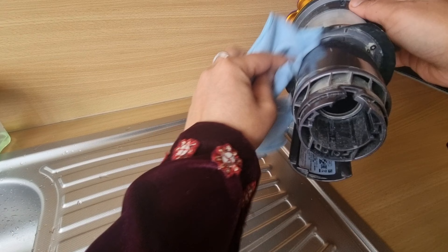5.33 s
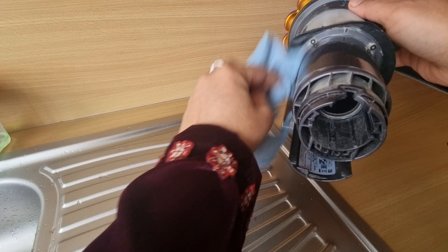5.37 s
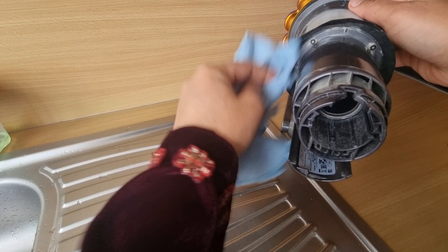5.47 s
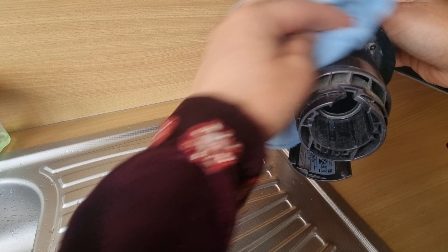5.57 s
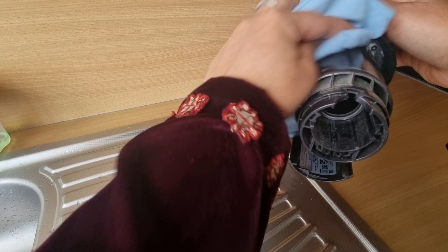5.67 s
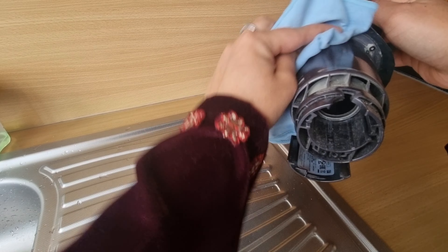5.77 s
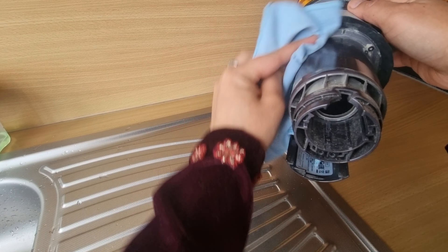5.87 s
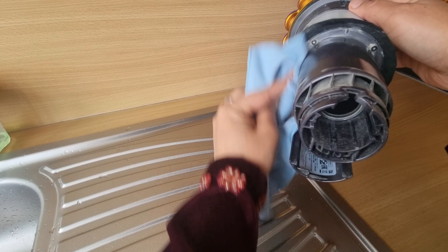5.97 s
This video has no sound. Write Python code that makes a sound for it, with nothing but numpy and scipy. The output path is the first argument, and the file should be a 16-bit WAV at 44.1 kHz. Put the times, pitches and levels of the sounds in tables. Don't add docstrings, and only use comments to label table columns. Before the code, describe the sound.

Dry fabric rasps against a plastic shell, which creaks and taps on the ribs of a thin steel board. Busy at first, it calms for a few seconds with only light rubs and ticks. A sudden heavy clunk, booming and rattling briefly, is followed by fast bounces, then more wiping and clicking, growing firmer at the end. Close microphones, short indoor echo, quiet kitchen air.

```python
import sys
import numpy as np
from scipy import signal
from scipy.fft import rfft, irfft, next_fast_len
from scipy.io import wavfile
from scipy.ndimage import uniform_filter1d

SR = 44100
rng = np.random.default_rng(int(sys.argv[2]) if len(sys.argv) > 2 else 0)


def convert_level_to_amplitude(level_db):
    exponent = np.asarray(level_db, float) / 20
    return 10 ** exponent


def to_wav(s):
    ch = np.atleast_2d(s).T
    pcm = np.round(np.clip(ch, -1, 1) * 32767)
    wavfile.write(sys.argv[1], SR, pcm.astype(np.int16))


N = 265658

# (fastest moment [s], rubbing level [dB], speeding up [s], slowing down [s],
# finest hiss above its usual share [dB])
STROKES = [(0.0, -47.5, 0.055, 0.18, 8), (0.33, -54.5, 0.11, 0.61, -19), (.52, -56.5, 0.36, 0.75, -10),
           (0.699, -47.5, 0.058, 0.11, 14), (1.085, -49.5, 0.1, 0.18, -12), (1.3, -47.5, 0.081, 0.054, 22),
           (1.31, -46, 0.26, 0.33, -3), (1.53, -59, 0.28, 0.83, -11), (2.0, -61, 0.088, 1, 4.5),
           (2.78, -56.5, 0.2, 0.25, 5.5), (2.89, -63.5, 0.18, 0.2, 5), (3.2, -65, 0.04, .3, 9),
           (3.64, -62.5, 0.88, 0.47, 4.5), (4.12, -55, 0.27, 0.98, -0.5), (4.44, -55, 1, 0.21, 8),
           (4.533, -44, 0.14, 0.089, 10), (4.66, -45, .1, 0.3, 2), (4.9, -61, 0.099, 0.2, 2),
           (4.98, -56, 0.044, 0.08, 18), (5.079, -47.5, 0.26, 0.099, 2), (5.23, -48.5, 0.24, 0.23, 6),
           (5.347, -50.5, 0.45, 0.084, 11.5), (5.52, -69.5, 0.58, 0.15, 13), (5.65, -53.5, 0.11, 0.54, -6),
           (5.9, -54, 0.29, 0.12, 28), (6.02, -40, 0.35, .1, 3)]
# (frequency [Hz], level per Hz [dB])
FIBRE_COLOUR = [(140, -55), (230, -21), (280, -8), (340, 4), (485, -11.5), (549, -24), (679, -15.5),
                (1040, -8), (3020, -7), (4790, -10.5), (7200, -13.5), (9070, -25), (16000, -27)]
# (time [s], extra body [dB])
PRESSURE = [(0, 4.5), (.33, 2), (.6, 3.5), (1.0, 1), (1.3, 1.5), (1.6, -2), (2.1, 2), (2.6, 0.5),
            (2.8, -10), (2.95, -15), (3.3, -1.5), (3.8, -1.5), (4.2, -0.5), (4.5, -3.5), (4.9, 2), (5.3, 0),
            (5.65, 4), (6.02, 0)]
# (frequency [Hz], level [dB], time to fade by 60 dB [s])
SHELL_MODES = [(1040, -14.5, 0.02), (1260, -9, 0.013), (1420, 3, 0.0086), (1663, -12.5, 0.04),
               (1880, -11.5, 0.063), (2310, -13.5, 0.015), (2870, -4.5, 0.02)]
LOW_SHELL_MODES = [(554.0, -7.0, 0.053), (783.0, -5.0, 0.043)]
# (time [s], peak level [dB], strongest ring [Hz], left minus right [dB])
DULL_KNOCKS = [(.3215, -19, 1790, -4.5), (.3314, -23.5, 1390, 1), (0.3497, -25.5, 1350, -1),
               (.395, -22, 1820, -9), (0.523, -27, 1700, 5), (.529, -26, 1080, 10.5),
               (0.5557, -35, 1660, -3), (0.667, -37.5, 1700, -3), (.743, -24, 1340, 3.5),
               (.9778, -54, 1110, -19), (1.0171, -29, 1100, 0), (1.027, -31, 1900, 0),
               (1.036, -24.5, 1100, -8), (1.2315, -33.5, 1120, -10), (1.252, -31.5, 1110, -4),
               (1.2859, -27.5, 1580, -7), (1.3792, -39, 1360, 5), (3.6186, -44.5, 1400, 14),
               (4.1122, -27.5, 1580, -8), (4.353, -34.5, 2020, -6), (4.621, -17, 1070, 3),
               (5.1194, -31, 2050, -1), (5.1514, -26.5, 1360, 2), (5.2023, -21, 1130, -3),
               (5.2342, -29, 1380, -6), (5.5375, -40, 1160, -3), (5.614, -28, 1420, -8),
               (5.6379, -19, 1140, -4), (5.7412, -31.5, 1670, 4), (5.918, -20, 2130, -2),
               (5.942, -30, 2050, -3), (5.962, -30, 2050, -3), (5.983, -29, 2100, -3),
               (6.003, -28, 2100, -3)]
BARE_KNOCKS = [(0.177, -40.5, 1430, -2), (.2886, -60, 950, -7), (0.4033, -26.5, 1340, 1),
               (0.6916, -24, 1300, -4), (0.7068, -21, 1310, -4), (.7295, -25, 1260, -9.5),
               (0.771, -33.5, 1860, -1), (1.0027, -36, 1290, -2), (1.0696, -22, 1350, -4),
               (1.272, -40, 1120, -19), (1.3168, -26, 1630, -8), (1.4165, -36, 2100, -8),
               (3.6794, -51, 1230, 8), (4.5688, -9, 1270, 0), (4.5788, -17, 2000, -4),
               (4.6257, -19.5, 1400, -11), (4.9346, -30, 2020, -10), (4.9877, -31.5, 2870, -5),
               (4.996, -26, 1250, -5), (5.0388, -30, 2870, -6), (5.0947, -26.5, 2950, -5),
               (5.102, -28, 1480, -9), (5.4992, -44.5, 1320, -4), (5.6005, -22.5, 1260, -3),
               (5.7528, -33.5, 1428, -1), (5.8313, -28, 1650, -0.5), (5.8557, -31.5, 2400, 5)]
# (time [s], peak level [dB], strongest ring [Hz], left minus right [dB], brightness [dB])
SNAPS = [(1.055, -26.5, 2620, -2, 38), (1.485, -20.5, 1720, -5.5, -16), (4.042, -24, 1040, -3.5, -15.5),
         (1.9053, -46, 1260, 5, 23.5), (2.5709, -32, 2340, 2, 8), (2.6204, -47, 2870, -3, 3),
         (2.69, -32, 3180, -10, 28), (3.178, -54, 3080, 13, -1), (3.2677, -51, 1060, -5, -5),
         (4.163, -40, 2100, -12, -8), (4.6729, -14, 1190, -4, -13), (5.2193, -22.5, 1780, -7, -6),
         (5.909, -26, 2470, -5, -6)]
# (low edge [Hz], high edge [Hz], level [dB])
CRACK_BANDS = [(945, 1100, -17), (2350, 4430, 6.5), (4040, 10100, 5), (10900, 22000, -0.5)]
# (frequency [Hz], level [dB])
RIM_MODES = [(4100, -32), (5500, -22), (7300, -43)]
# (time [s], peak level [dB], whole-board boom [dB], sheet rattle [dB],
# strongest body tone [Hz])
THUMPS = [(0.049, -38.5, -23, 2.5, 358), (0.225, -42, -10, -5, 200), (0.322, -34, -4, 4.5, 369),
          (0.398, -41.5, -20, -5, 444), (0.691, -38, -9, 7, 377), (1.308, -26.5, -20, -0.5, 400),
          (1.335, -26.5, -12, -6.5, 205), (1.381, -30, -20, -6, 202), (1.61, -44, -20, 4.5, 331),
          (1.72, -46, -15, 0, 200), (1.85, -47, -20, 0, 320), (2.343, -44, -30, -1.5, 400),
          (2.692, -44.5, -20, 0, 223), (2.77, -48, -20, 0, 500), (3.379, -35, -26, 4, 224),
          (3.518, -54, -14, 4, 320), (3.759, -50, -25, 4, 304), (4.041, -43, -22, 5, 202),
          (3.675, -43, -26, 7, 347), (4.5622, -21, -3, 2, 550), (4.569, -1.5, 0.5, -7, 190),
          (4.619, 2.5, -7.5, -7, 300), (4.674, -5, -6, -4, 318), (4.645, -9.5, -16, -10, 400),
          (4.698, -12.5, -19, -10, 300), (4.724, -18, -15, -12, 350), (4.795, -25.5, -20, -6, 330),
          (4.916, -32, -20, 3, 304), (5.0, -39, -20, -5, 202), (5.098, -36, -21, 5, 363),
          (5.155, -45.5, -20, -5, 398), (5.205, -21.5, -8, -5.5, 395), (5.218, -22, -23, -11, 300),
          (5.311, -44, -27, 2, 393), (5.636, -28, -20, -29, 300), (5.885, -38, -17, -3, 205),
          (5.908, -29, -6, 0, 600), (6.002, -32, 7, 0, 250)]
# (frequency [Hz], level [dB], time to fade by 60 dB [s])
BOARD_MODES = [(54.43, -6, 0.74), (95, -5, 0.096), (117.8, 4.5, 0.42), (160, -3, 0.13), (197, 2.5, 0.14),
               (275, -13, 0.045), (317, -7.5, 0.11), (403.4, -5, 0.11), (428.5, -8.5, 0.084),
               (565, -10, 0.05), (658, -11.5, 0.059), (777, -7, 0.072), (830, -7, 0.054),
               (1073, -2.5, 0.054)]
# (low edge [Hz], high edge [Hz], level [dB], time to fade by 60 dB [s])
RATTLE_BANDS = [(252, 363, -19, 0.36), (488, 1010, -27, 0.39), (930, 1450, -29, 0.28),
                (1590, 3800, -33, 0.34)]
# (time [s], level [dB], letting go [s])
LEANS = [(.12, -45.5, 0.073), (.3, -38.5, 0.14), (.45, -37.5, 0.028), (.6, -41, 0.15), (.78, -37.5, 0.087),
         (1.09, -37.5, 0.091), (1.36, -36, .1), (1.43, -30, 0.06), (1.49, -29, 0.09), (1.65, -40.5, 0.19),
         (2.212, -50, 0.19), (2.61, -46, .1), (2.83, -48, 0.27), (3.22, -57, 0.14), (3.31, -39.5, 0.1),
         (3.63, -50, 0.16), (4.1, -41.5, 0.28), (4.18, -38, 0.19), (4.52, -61, 0.071), (4.774, -23, 0.076),
         (4.86, -38, 0.15), (4.97, -41, 0.017), (5.08, -32.5, 0.21), (5.3, -43, 0.099),
         (5.411, -42.5, 0.042), (5.71, -49.5, .1), (5.94, -41, 0.065), (6.02, -24.5, 0.11)]
NUDGES = [(0.0, -40, 0.11), (.3, -40, 0.075), (.62, -46.5, 0.25), (.72, -55, .1), (.97, -35, 0.029),
          (1.36, -35, 0.21), (1.59, -52, 0.11), (1.74, -49, 0.16), (2.06, -37.5, 0.14), (2.43, -40, 0.32),
          (2.5, -52, 0.22), (2.83, -45.5, 0.12), (3.22, -43.5, 0.19), (3.401, -37, 0.021),
          (3.63, -47.5, 0.079), (4.18, -45, 0.049), (4.52, -43.5, 0.43), (4.72, -28, 0.073),
          (5.016, -51, .1), (5.23, -47, 0.14), (5.556, -42, 0.076), (5.94, -31, 0.055),
          (5.98, -26.5, 0.062)]
ROCKS = [(.06, -43.5, 0.15), (.36, -38.5, 0.14), (.47, -47, 0.25), (.6, -47.5, 0.076), (.72, -44.5, 0.2),
         (.97, -49.5, 0.27), (1.088, -39, 0.14), (1.359, -29, 0.18), (1.6, -53, 0.085), (2.06, -48, 0.15),
         (2.27, -57.5, 0.078), (2.83, -53.5, 0.14), (3.4, -45, 0.026), (3.63, -78.5, 0.15),
         (4.1, -42, 0.23), (4.29, -51.5, 0.34), (4.41, -44.5, 0.076), (4.72, -34, 0.054),
         (4.774, -31, 0.16), (5.016, -42.5, 0.075), (5.099, -42.5, 0.29), (5.36, -49, 0.11),
         (5.494, -54, 0.27), (5.63, -44.5, 0.39), (5.77, -46, 0.066), (5.94, -39.5, .06),
         (6.02, -26.5, 0.11)]
# (frequency [Hz], width [Hz], level [dB])
SHAKEN_MODES = [
    [(52.25, 3.5, 0)],
    [(76.2, 11, 0)],
    [(116.2, 6.6, 6), (140, 78, -3.5), (198.3, 27, -4.5)],
]
# (frequency [Hz], level per Hz [dB])
ROOM_COLOUR = [(76, -30), (130, 11), (233, -20), (356, -14.5), (450, -10), (640, -16), (810, -8),
               (1000, -15.5), (1290, -16), (2890, -14), (4780, -16), (7150, -17.5), (10500, -53),
               (12600, -31), (16000, -22.5)]
# (frequency [Hz], width [Hz], level [dB])
DRONE = (346, 32, -62.5)
# (frequency [Hz], side minus mid [dB])
STEREO_WIDTH = [(60, -15.5), (120, -14.5), (240, -9.5), (480, 1), (950, 3), (1890, 2), (3770, 1),
                (7520, 0.5), (15000, 0)]
# (frequency [Hz], width [Hz], gain [dB])
MICROPHONE = [(7350, 1870, 9.5), (8800, 5840, -6), (15600, 1900, 6)]

TOP_HZ = 16100
STEP = 32
GRAIN_DB = 0.8


def wiping():
    curve, rest_db = 2.38, -87
    jerk_db, jerk_t60_s = -21.5, 0.17
    strokes = np.array([swell(s, db, rise, fall, curve) for s, db, rise, fall, _ in STROKES])
    s, peak_db, _, bright_db = np.transpose(knock_list())[:4]
    kicks = impulses(s, convert_level_to_amplitude(2 * (peak_db + jerk_db + 0.087 * bright_db)))
    jerks = signal.lfilter([1], [1, -convert_level_to_amplitude(-120 / (jerk_t60_s * SR))], kicks + 1e-18)
    power = per_sample(strokes.sum(axis=0)) + jerks + convert_level_to_amplitude(2 * rest_db)
    rub_db = 10 * np.log10(power)
    fine_db = per_sample(np.array(STROKES)[:, -1] @ strokes) / power
    pressed_db = np.interp(np.arange(N) / SR, *np.transpose(PRESSURE))
    body_db = 0.17 * (-52.5 - rub_db) - 0.13 * fine_db + pressed_db
    return rub_db, fine_db, body_db


def cloth(rub_db, fine_db, body_db):
    rasp = rubbing(FIBRE_COLOUR, patchy_db=1.14, grain_db=GRAIN_DB, fine_db=fine_db, body_db=body_db)
    creaking = creak(per_s=270, spread_db=4.5)
    return convert_level_to_amplitude(rub_db + 3.5) * rasp + convert_level_to_amplitude(rub_db + body_db - 0.5) * creaking


def rubbing(spectrum, patchy_db, grain_db, fine_db=0, body_db=0):
    out, power, together = 0, 0, drift(22.0)
    slips = rng.standard_normal((2, 2, N)) * convert_level_to_amplitude(grain_db * drift(150))
    edges = np.geomspace(140, TOP_HZ, 17)
    for k, (low, high) in enumerate(zip(edges, edges[1:])):
        mid, side = band(slips[k % 2], low, high)
        hz = np.sqrt(low * high)
        hiss_db = fine_db * np.clip(np.log2(hz / 6000), 0, 1)
        tilt_db = hiss_db + body_db * np.clip(np.log2(2600 / hz), 0, 1)
        depth_db = patchy_db * min(1, 700 / hz) ** 0.22
        gain = convert_level_to_amplitude(tilt_db + depth_db * (0.36 * together + drift(14)))
        level = convert_level_to_amplitude(at_hz(spectrum, hz))
        out = out + gain * level * left_right(mid, side, hz)
        power += np.mean((level * mid) ** 2)
    return out / np.sqrt(power)


def creak(per_s, spread_db):
    out = 0
    for hz, mode_db, t60 in SHELL_MODES + LOW_SHELL_MODES:
        caught = rng.random((2, N)) < per_s * convert_level_to_amplitude(5.0 * drift(7)) / SR
        sizes = convert_level_to_amplitude(spread_db * np.minimum(rng.exponential(1, (2, N)), 4))
        sizes = sizes * rng.choice([-1, 1], (2, N))
        out = out + convert_level_to_amplitude(mode_db) * ring(left_right(*(caught * sizes), hz), hz, 1.3 * t60)
    return rms_one(out)


def knock_list():
    # (time [s], peak [dB], ring [Hz], brightness [dB], contact fade [s], left minus right [dB])
    dull = [(s, db, hz, -50.5, 0.03, pan) for s, db, hz, pan in DULL_KNOCKS]
    bare = [(s, db, hz, -21.5, 0.024, pan) for s, db, hz, pan in BARE_KNOCKS]
    snaps = [(s, db, hz, bright, 0.024, pan) for s, db, hz, pan, bright in SNAPS]
    return sorted(dull + bare + snaps)


def shell_knocks():
    out, t = np.zeros((2, N + 4096)), np.arange(4096) / SR
    for s, peak_db, ring_hz, bright_db, t60, pan_db in knock_list():
        luck = rng.standard_normal(len(SHELL_MODES))
        slips = rng.standard_normal((2, 2, len(t)))
        grip = np.minimum(rng.standard_normal(len(t) // 32), 1)
        grip[:4] = 1
        slips = slips * convert_level_to_amplitude(7.0 * grip.repeat(32))
        contact = (1 - np.exp(-t / 0.0027)) * convert_level_to_amplitude(-60 * t / np.clip(t60, .006, .09))

        knock = convert_level_to_amplitude(-27.0) * ring(left_right(*slips[0], ring_hz) * contact, ring_hz, 22 / ring_hz)
        for (hz, mode_db, mode_t60), chance in zip(SHELL_MODES, luck):
            level_db = mode_db - 4.2 * abs(np.log2(hz / ring_hz)) + 7 * np.tanh(chance) - 33
            knock += convert_level_to_amplitude(level_db) * ring(left_right(*slips[0], hz) * contact, hz, mode_t60)
        for low, high, crack_db in CRACK_BANDS:
            tilt_db = bright_db * np.clip(np.log2(high / 1900) / 2, 0, 1)
            crack = band(left_right(*slips[1], high) * contact, low, high)
            knock += convert_level_to_amplitude(crack_db + tilt_db) * crack
        rim_shift = 1 + 0.12 * np.tanh(luck[-1])
        for (hz, rim_db), chance in zip(RIM_MODES, luck):
            rim = ring(left_right(*slips[1], hz) * contact, hz * rim_shift, 0.016)
            knock += convert_level_to_amplitude(rim_db + bright_db + 6 * np.tanh(chance)) * rim

        knock = band(knock, 760, TOP_HZ)
        knock *= convert_level_to_amplitude(-1.0) / np.sort(np.abs(knock), axis=None)[-12]
        at = round(s * SR)
        out[:, at:at + len(t)] += convert_level_to_amplitude(peak_db) * knock * convert_level_to_amplitude([[pan_db / 2], [-pan_db / 2]])
    return out[:, :N]


def thumps():
    s, peak_db, boom_db, shiver_db, body_hz = np.transpose(THUMPS)
    luck, out = rng.standard_normal((len(s), 2, len(BOARD_MODES))), 0
    since = np.arange(N) / SR - 4.685
    damped = convert_level_to_amplitude(-92 * np.where(since < 0.45, np.maximum(since, 0), 0))
    for k, (hz, mode_db, t60) in enumerate(BOARD_MODES):
        upper_db = 2.93 * luck[:, 0, k] - 5 - 4.5 * abs(np.log2(hz / body_hz))
        gain = convert_level_to_amplitude(peak_db + mode_db + np.where(hz < 135, boom_db - 7.0, upper_db))
        mid = ring(impulses(s, -gain * (-1) ** k), hz, t60)
        side = ring(impulses(s, gain * np.sign(luck[:, 1, k])), hz * 1.02, t60)
        side = side * np.clip(hz / 260, 0, 1)
        out = out + left_right(mid, side, hz) * (damped if 85 < hz < 135 else 1)
    out = signal.sosfilt(signal.butter(2, 905, fs=SR, output="sos"), out)
    for low, high, rattle_db, t60 in RATTLE_BANDS:
        hits = impulses(s, convert_level_to_amplitude(peak_db + shiver_db + rattle_db))
        fade = signal.lfilter([1], [1, -convert_level_to_amplitude(-60 / (t60 * SR))], hits)
        noise = rms_one(band(rng.standard_normal((2, N)), low, high))
        out = out + fade * left_right(*noise, low)
    return out


def board_shake():
    out = 0
    rises_s, rests_db = (0.14, 0.051, 0.11), (-59.5, -61.5, -65)
    for pushes, rise_s, rest_db, modes in zip((LEANS, NUDGES, ROCKS), rises_s, rests_db, SHAKEN_MODES):
        power = convert_level_to_amplitude(2 * rest_db) + sum(swell(s, db, rise_s, fall_s, 1.57) for s, db, fall_s in pushes)
        group = 0
        for hz, width, mode_db in modes:
            t60 = np.log(1000) / np.pi / width
            mid, side = ring(ring(rng.standard_normal((2, N)), hz, t60), hz, t60 / 3)
            group = group + convert_level_to_amplitude(mode_db) / mid.std() * left_right(mid, side, hz)
        strength = uniform_filter1d(np.mean(group ** 2, axis=0), size=round(0.11 * SR))
        out = out + per_sample(np.sqrt(power)) * group / np.sqrt(strength + 1e-9)
    return out


def kitchen(x):
    size = next_fast_len(N + SR)
    hz = np.arange(size // 2 + 1) * SR / size
    t60 = 0.33 / np.hypot(1, hz / 12000)
    out = []
    for side, lags in zip(x, rng.uniform(.013, .045, (2, 12))):
        loops = [convert_level_to_amplitude(-60 * lag / t60) * np.exp(-2j * np.pi * hz * lag) for lag in lags]
        echo = sum((-1) ** k * loop / (1 - loop) for k, loop in enumerate(loops))
        out.append(irfft(rfft(side, size) * echo, size)[:N])
    return np.array(out)


def room_tone(rub_db):
    hz, width, drone_db = DRONE
    mid, side = ring(rng.standard_normal((2, N)), hz, np.log(1000) / np.pi / width)
    drone = convert_level_to_amplitude(drone_db + 0.75 * drift(16)) / mid.std() * left_right(mid, side, hz)
    air = convert_level_to_amplitude(-60.0) * rubbing(ROOM_COLOUR, patchy_db=-4.0, grain_db=GRAIN_DB / 2)
    duck_db = 0.5 * np.clip(uniform_filter1d(rub_db, size=SR // 16) + 65, -16.5, 0)
    return convert_level_to_amplitude(duck_db) * (drone + air)


def swell(s, level_db, rise_s, fall_s, curve):
    t = np.arange(N // STEP + 2) * STEP / SR - s
    away = np.where(t < 0, -t / max(rise_s, .01), t / max(fall_s, .01))
    left = np.clip(1 - away, 0, 1)
    return (convert_level_to_amplitude(level_db) * left ** curve) ** 2


def per_sample(coarse):
    return np.interp(np.arange(N) / STEP, np.arange(len(coarse)), coarse)


def drift(rate):
    r = np.exp(-80 * np.pi * rate / SR)
    slow = signal.lfilter([1], [1, -2 * r, r * r], rng.standard_normal(N // 40 + 2002))[2000:]
    return np.interp(np.arange(N) / 40, np.arange(len(slow)), rms_one(slow))


def impulses(times, gains):
    out = np.zeros(N)
    out[np.minimum(np.round(times * SR).astype(int), N - 1)] = gains
    return out


def ring(force, hz, t60):
    r, w = convert_level_to_amplitude(-60 / (t60 * SR)), 2 * np.pi * hz / SR
    return signal.lfilter([0, np.sin(w)], [1, -2 * r * np.cos(w), r * r], force + 1e-18)


def band(x, low_hz, high_hz):
    return signal.sosfilt(signal.butter(2, [low_hz, high_hz], "band", fs=SR, output="sos"), x)


def bell(x, hz, width, gain_db):
    w, a = 2 * np.pi * hz / SR, convert_level_to_amplitude(gain_db / 2)
    alpha = np.sin(w) * width / hz / 2
    top = [1 + alpha * a, -2 * np.cos(w), 1 - alpha * a]
    bottom = [1 + alpha / a, -2 * np.cos(w), 1 - alpha / a]
    return signal.lfilter(top, bottom, x)


def left_right(mid, side, hz):
    width = convert_level_to_amplitude(at_hz(STEREO_WIDTH, hz))
    return np.array([mid + width * side, mid - width * side])


def at_hz(points, hz):
    return np.interp(np.log(hz), np.log(np.array(points)[:, 0] + 1), np.array(points)[:, 1])


def rms_one(x):
    return x / np.sqrt(np.mean(x ** 2) + 1e-20)


def scene():
    knocks, blows = shell_knocks(), thumps()
    rub_db, fine_db, body_db = wiping()
    airborne = band(convert_level_to_amplitude(-26) * knocks + convert_level_to_amplitude(-23.5) * blows, 320, TOP_HZ)
    steady = cloth(rub_db, fine_db, body_db) + board_shake() + room_tone(rub_db)
    return steady + knocks + blows + kitchen(airborne)


def band_limit(x):
    return signal.sosfilt(signal.butter(12, 16440, fs=SR, output="sos"), x)


def record(dry):
    for hz, width, gain_db in MICROPHONE:
        dry = bell(dry, hz, width, gain_db)
    cut = signal.sosfilt(signal.butter(3, 38, "high", fs=SR, output="sos"), dry)
    rounded = 1.14 * np.tanh(cut / 1.48)
    mix = signal.sosfilt(signal.cheby2(12, 60, TOP_HZ + 300, fs=SR, output="sos"), rounded)
    return band_limit(mix)


dry = scene()
out = record(dry)
to_wav(out)
```